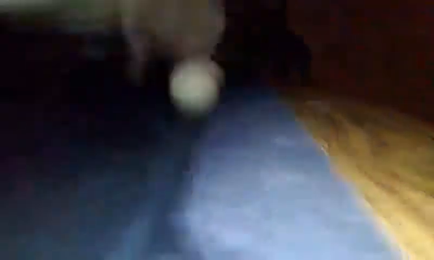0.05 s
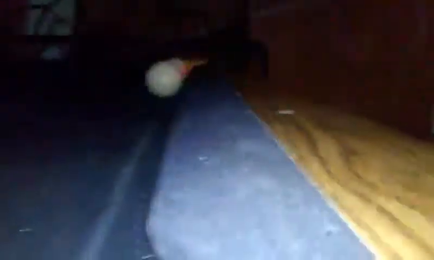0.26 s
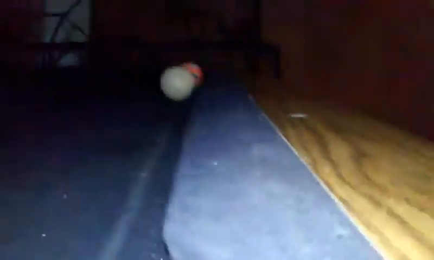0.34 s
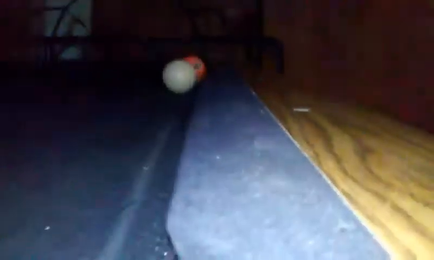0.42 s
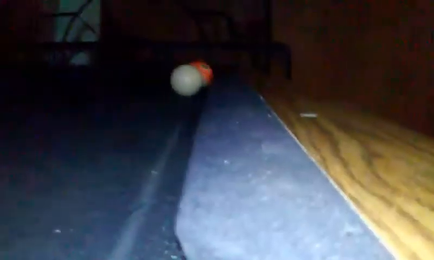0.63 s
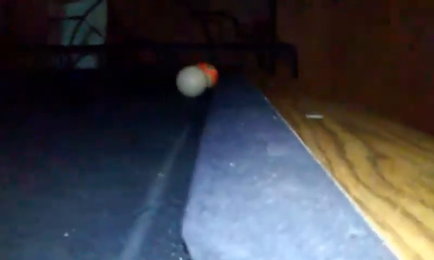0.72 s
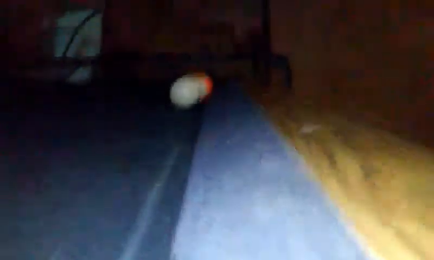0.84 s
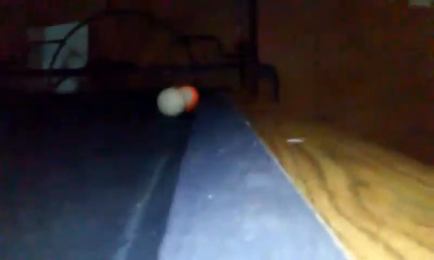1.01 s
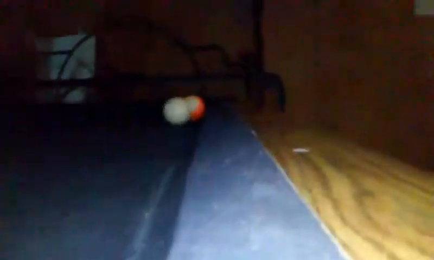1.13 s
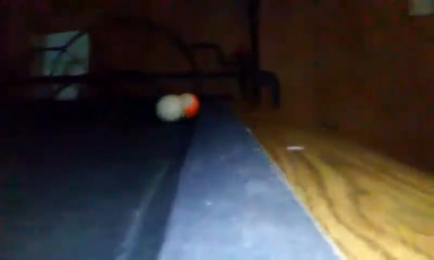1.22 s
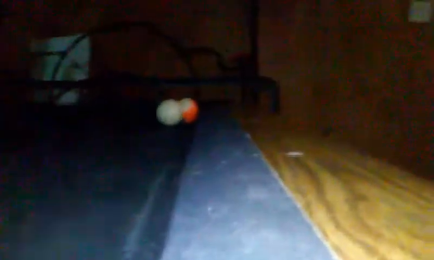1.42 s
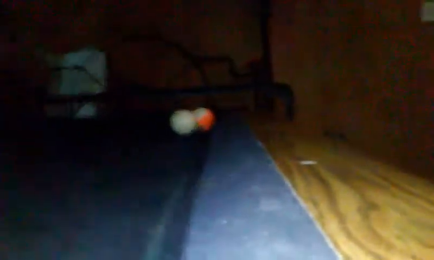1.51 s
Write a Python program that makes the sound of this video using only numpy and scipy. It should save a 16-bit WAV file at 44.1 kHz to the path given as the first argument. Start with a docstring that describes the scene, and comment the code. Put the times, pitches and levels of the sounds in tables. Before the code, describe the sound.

Sharp, quick clacks of billiard balls as one is tossed in, followed by soft rolling thuds.

```python
"""A small, hard-walled room with a cloth-covered billiard table. An arm swings and tosses a ball, which
bounces twice, clacks against other balls and rolls off into the cushions; dull thuds follow, and a last
far clack. Clacks and ticks are short pulses coloured by table and room, thuds are damped swings of the
table, and the cloth rumbles, hisses and swishes as grainy noise over a faint hum.
The close microphone's limiter flattens the loudest clacks and its gate turns down the quiet."""
import sys
import numpy as np
from scipy import signal
from scipy.fft import rfft, irfft
from scipy.io import wavfile
from scipy.ndimage import uniform_filter1d, minimum_filter1d

SR = 44100
rng = np.random.default_rng(int(sys.argv[2]) if len(sys.argv) > 2 else 0)


def transcribe(u):
    """Save the signal u as a 16-bit wav file named by the first command-line argument.

    u: samples, shape (n,) or (channels, n), limited to [-1, 1]; the rate is SR.
    q: integer samples, one column per channel.
    """
    v = np.clip(np.atleast_2d(u).T, -1, 1)
    q = np.round(v * 32767).astype(np.int16)
    wavfile.write(sys.argv[1], SR, q)


N = 68355


def undb(db):
    """Decibels to gain."""
    return 10 ** (np.asarray(db) / 20)


def unit(x):
    """Scale to rms 1."""
    return x / np.sqrt(np.mean(x ** 2))


def decay(t, t60):
    """A fade that loses 60 dB every t60 seconds."""
    return np.exp(-np.log(1000) * t / t60)


def on_bins(points, stretch=1):
    """An EQ curve over log frequency, read at every bin of a double-length spectrum."""
    hz, db = np.array(points, float).T
    return np.interp(np.log(np.arange(N + 1) * SR / (2 * N) + 1), np.log(hz * stretch), db)


def impulse(db):
    """The shortest causal pulse with this spectrum."""
    cepstrum = irfft(np.log(undb(db)))
    cepstrum[1:N] *= 2
    cepstrum[N + 1:] = 0
    return irfft(np.exp(rfft(cepstrum)))[:N]


def noise(db):
    """Noise of rms 1 with this spectrum."""
    return unit(irfft(rfft(rng.standard_normal(2 * N)) * undb(db))[:N])


def grain(depth_db=1, rate_hz=96.6):
    """Quick random unevenness of the cloth, as a gain."""
    wobble = np.interp(np.arange(N) / SR * rate_hz, np.arange(N), rng.standard_normal(N))
    return undb(depth_db * wobble)


def rub(fader, colour):
    """Contact with cloth: coloured, grainy noise riding a level curve."""
    level_db = np.interp(np.arange(N) / SR, *np.array(fader).T)
    return noise(on_bins(colour)) * grain() * undb(level_db)


def hum(hz=58, db=-66.5):
    """A faint, low, steady tone under everything."""
    return undb(db) * unit(np.sin(2 * np.pi * hz * np.arange(N) / SR))


def rolling():
    """Balls rumble low as they roll over the cloth."""
    # swells of the rumble: t/s, level/dB
    fader = [(0, -65.5), (.04, -65), (.075, -43.5), (.17, -42.5), (.3, -34), (.5, -42), (.62, -31.5),
             (.74, -44), (.85, -38.5), (.98, -38), (1.06, -53), (1.1, -61), (1.17, -59.5), (1.215, -62.5),
             (1.26, -55.5), (1.31, -76), (1.345, -68), (1.55, -77.5)]
    # its dark colour: f/Hz, level/dB
    colour = [(25, 2), (60, 0.5), (130, 0.5), (300, 2), (480, 0.5), (800, -16.5), (1500, -15.5),
              (3000, -41.5), (16000, -70)]
    return rub(fader, colour)


def arm_swing():
    """The arm swings forward with a soft rub and lets go."""
    # rise and fall of the rub: t/s, level/dB
    fader = [(0, -90), (.035, -74), (.06, -54.5), (.095, -43), (.13, -43.5), (.18, -45), (.33, -48),
             (.45, -71.5), (.55, -100)]
    # its airy colour: f/Hz, level/dB
    colour = [(150, -2), (280, 5.5), (600, -3), (1200, -6.5), (2100, -10), (3200, 2.5), (4400, -5.5),
              (5400, -15.5), (7000, 0.5), (8400, -6.5), (10500, 0.5), (13000, -9.5), (16000, -13.5)]
    return rub(fader, colour)


def room(room_db, build_s=0.0033, scatter_db=1, scatter_t60_s=0.0061):
    """Direct sound, scatter off balls and rails, near reflections and a diffuse tail."""
    # reverb time of the room: f/Hz, t60/s
    reverb_times = [(60, 0.26), (250, 0.2057), (800, 0.3972), (2000, .37), (4000, 0.3335), (8000, 0.43),
                    (16000, 0.2939)]
    # reflections off the nearest surfaces: delay/s, level/dB
    echoes = [(.007, -11), (.0095, -15.5), (0.0115, -8.5)]
    t = np.arange(N) / SR
    hz, times, cells = signal.stft(rng.standard_normal(N), SR, nperseg=256)
    bands, band_t60 = np.array(reverb_times).T
    t60 = np.interp(np.log(hz + 1), np.log(bands), band_t60)
    tail = signal.istft(cells * decay(times, t60[:, None]))[1][:N]
    tail *= 1 - np.exp(-t / build_s)
    low_cut = signal.butter(2, 1200, "high", fs=SR, output="sos")  # long waves pass small things by
    scatter = signal.sosfilt(low_cut, rng.standard_normal(N) * decay(t, scatter_t60_s))
    response = (unit(tail) * undb(room_db) + unit(scatter) * undb(scatter_db)) / np.sqrt(N)
    for delay, db in echoes:
        response[int(delay * SR)] += undb(db + min(room_db, 0))  # close sounds stand clear of them
    response[0] += 1
    return response


def strike(pulse, start, db, room_db):
    """Sound a pulse in the room; its level is the direct energy spread over 10 ms."""
    pulse = pulse * np.sqrt(SR / 100 / np.sum(pulse ** 2)) * undb(db)
    return np.pad(signal.fftconvolve(pulse, room(room_db)), (int(start * SR), 0))[:N]


def thuds(top_hz=1100):
    """The table gives a few heavily damped swings at each blow."""
    # ball against slate, cushion or frame: t/s, level/dB, f/Hz, t60/cycles, reverb/dB
    hits = [(0.073, -38, 260, 2.7, 2.5), (0.1876, -16, 432, 2.43, 0), (0.211, -19.5, 165, 2.8, 8.5),
            (.2652, -11, 486, 4.1, -2), (0.291, -21, 60.2, 2, -8.5), (0.345, -17, 270, 1.6, 4.5),
            (0.36, -19.5, 95, 2, 5.5), (0.393, -26, 195, 4.4, 0), (0.513, -49.5, 432, 6.2, 18.5),
            (0.668, -31.5, 87, 8.5, -6), (0.76, -36.5, 486, 9, 7), (0.922, -14.5, 52, 5.7, -29.5),
            (0.955, -34, 517, 1.33, -1.5), (0.9695, -21, 128, 2.2, -5.5), (1.025, -37, 63.3, 3, 0.5),
            (1.133, -43.5, 130, 3.5, -4), (1.149, -38.5, 75, 3, 2.5), (1.234, -30, 47.4, 3, -4),
            (1.239, -51, 170, 2, 5), (1.272, -54.5, 59.9, 3.95, 3.5), (1.312, -62.5, 426, 4.2, -8)]
    t, out = np.arange(N) / SR, 0
    soften = signal.butter(2, top_hz, fs=SR, output="sos")
    for start, db, hz, cycles, room_db in hits:
        attack = 1 - np.exp(-hz * t)
        swing = np.sin(2 * np.pi * hz * t) * decay(t, cycles / hz) * attack
        out += strike(signal.sosfilt(soften, swing), start, db, room_db)
    return out


def rustle():
    """Balls brush the cloth with a light hiss."""
    # swells of the hiss: t/s, level/dB
    fader = [(0, -90), (.1, -71), (.14, -42), (.35, -54), (.6, -59), (.73, -64), (.76, -48.5),
             (1.06, -53.5), (1.1, -75), (1.14, -60.5), (1.195, -57.5), (1.22, -73), (1.25, -59.5),
             (1.305, -63), (1.34, -81.5), (1.55, -84.5)]
    # its colour: f/Hz, level/dB
    colour = [(200, 12.5), (1000, 1.5), (2000, -4), (3200, 0), (5200, -12.5), (7200, 2), (10000, 0),
              (13000, -3), (16000, -10)]
    return rub(fader, colour)


def ticks(root_hz=7000):
    """The bright edge of the hardest contacts."""
    # hard contacts: t/s, level/dB, f/Hz, reverb/dB
    hits = [(0.1902, -26, 7000, -2.5), (0.2116, -2.5, 6800, -25), (0.2174, -29, 7650, -12),
            (0.268, -20.5, 7000, -13), (0.2916, -20.5, 7230, -12), (0.3414, -26.5, 6990, 2.5),
            (.5135, -38, 7600, 6.5), (.8747, -44.5, 9000, 0)]
    # colour of a tick at the root pitch: f/Hz, level/dB
    colour = [(200, -11), (2000, 2.5), (4700, -12), (6500, -2), (8500, -11), (10000, -7.5), (12000, -17),
              (16000, -24)]
    return sum(strike(impulse(on_bins(colour, hz / root_hz)), start, db, room_db)
               for start, db, hz, room_db in hits)


def clacks(root_hz=2000):
    """Hard balls do not ring: each contact is one short pulse, and the table and room do the rest."""
    # ball against ball: t/s, level/dB, f/Hz, bass/dB, treble/dB, reverb/dB
    hits = [(0.2123, 3, 1860, -7.5, 15.5, 6), (.2692, 3.5, 1976, -5.5, 14.5, -2),
            (0.2913, 5, 1933, -7, 13, -0.5), (0.5147, -25.5, 1990, 7.5, 5.5, 2.5),
            (.5490, -3.5, 2100, 0, -7.5, 2), (.802, -31.5, 1815, 7, -4, 11),
            (0.8734, -33.5, 1713, 9, -7, 4.5), (1.5297, -46, 1728, -6.5, -22, 1)]
    # colour of a clack at the root pitch: f/Hz, level/dB
    colour = [(60, -23.5), (300, -19.5), (750, -14.5), (1150, -10), (1550, -4.5), (2000, -0.5),
              (2600, -7.5), (3400, -13.5), (4200, -27), (5300, -40), (8000, -66.5), (16000, -68)]
    low_shelf, high_shelf = on_bins([(700, 1), (1600, 0)]), on_bins([(3300, 0), (5000, 1)])
    out = 0
    for start, db, hz, bass_db, treble_db, room_db in hits:
        spectrum_db = on_bins(colour, hz / root_hz) + bass_db * low_shelf + treble_db * high_shelf
        out += strike(impulse(spectrum_db), start, db, room_db)
    return out


def swish(start_s=0.741, attack_s=0.0022, hold_s=0.047):
    """A short rub that starts at once and fades in a few broad resonances."""
    # resonances of the rub: f/Hz, width/Hz, level/dB, t60/s
    resonances = [(1440, 1100, -37, 0.31), (4800, 670, -40, 0.12), (7440, 910, -45, 0.55),
                  (11100, 680, -59.5, 0.47)]
    t, out = np.arange(N) / SR - start_s, 0
    bin_hz = np.arange(N + 1) * SR / (2 * N)
    for hz, width, db, t60 in resonances:
        band = noise(-20 * np.log10(1 + (2 * (bin_hz - hz) / width) ** 2))
        out += band * undb(db) * decay(np.maximum(t - hold_s, 0), t60)
    return out * np.clip(t / attack_s, 0, 1) * grain()


def scene():
    """The hits over a bed of cloth noise and hum, in mono."""
    return (clacks() + ticks() + thuds() + rolling() + rustle() + arm_swing() + swish() + hum())[None]


def record(dry):
    """A low cut, a fast limiter whose overshoot is rounded off, a gate on the quietest sound, a top cut."""
    low_cut_hz, top_cut_hz = 18, 15800
    limit, hold, ceiling = 1.445, int(0.003 * SR), 0.99
    gate_db, gate_range_db = -51.5, -14
    x = signal.sosfilt(signal.butter(2, low_cut_hz, "high", fs=SR, output="sos"), dry[0])
    limiter_gain = limit / np.maximum(abs(x), limit)
    x = x * uniform_filter1d(minimum_filter1d(limiter_gain, hold), hold)
    envelope = abs(signal.hilbert(x))
    x = x / (1 + (envelope / ceiling) ** 8) ** (1 / 8)  # soft knee
    level_db = 10 * np.log10(np.abs(uniform_filter1d(x ** 2, size=900)) + 1e-12)
    gate = undb(np.clip(level_db - gate_db, gate_range_db, 0))
    top_cut = signal.ellip(8, .2, 70, top_cut_hz, fs=SR, output="sos")
    return signal.sosfilt(top_cut, x * gate)[None]


dry = scene()
out = record(dry)
transcribe(out)
```